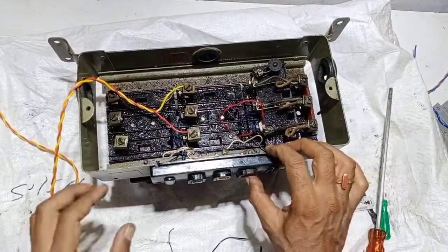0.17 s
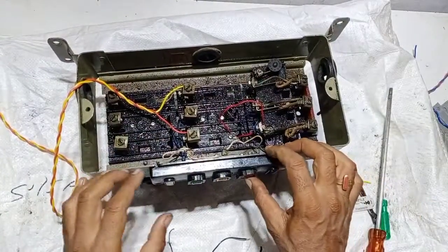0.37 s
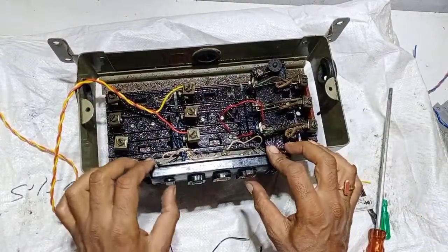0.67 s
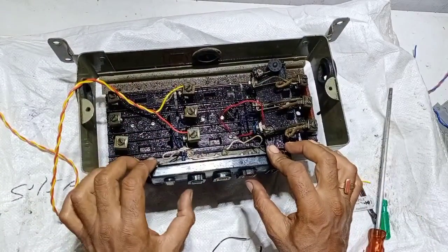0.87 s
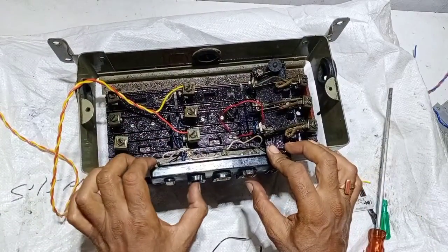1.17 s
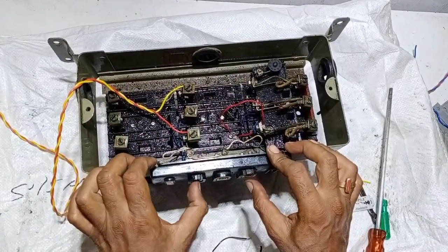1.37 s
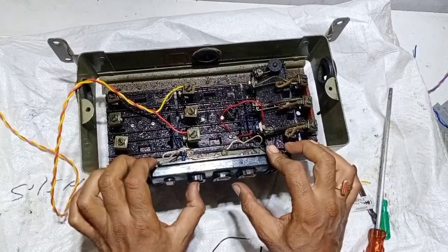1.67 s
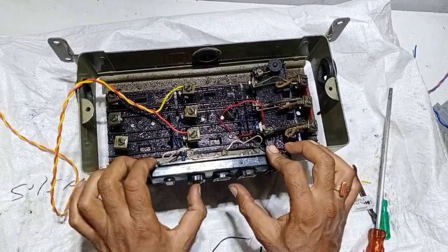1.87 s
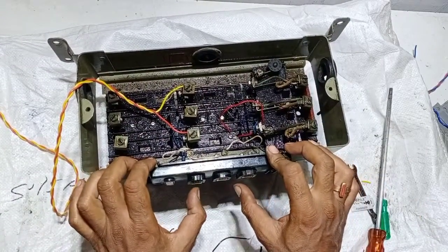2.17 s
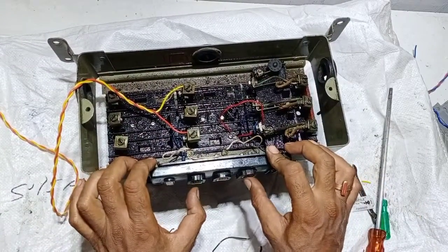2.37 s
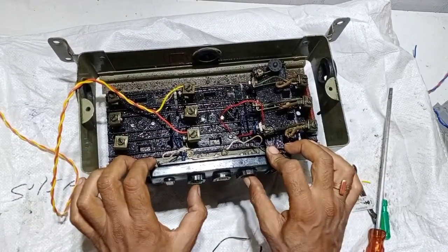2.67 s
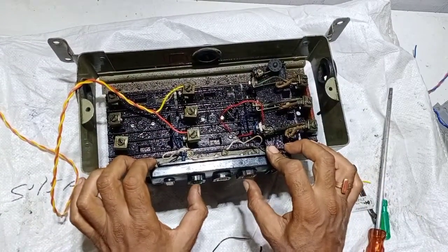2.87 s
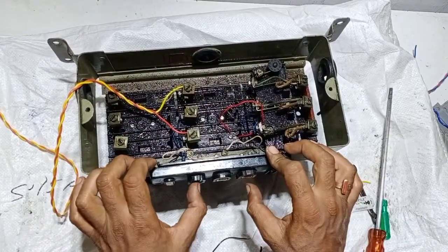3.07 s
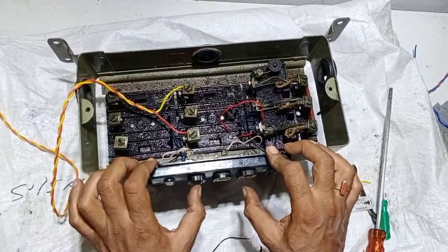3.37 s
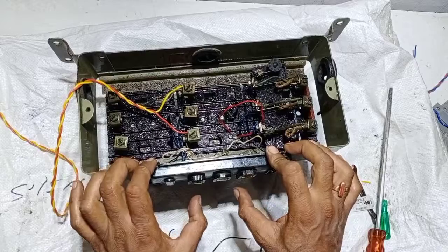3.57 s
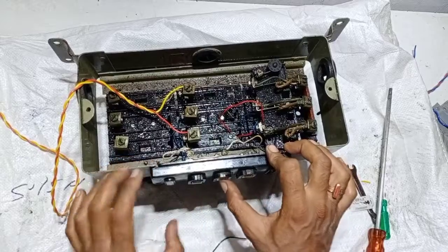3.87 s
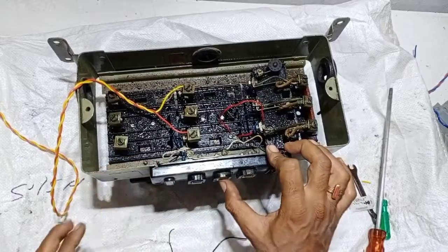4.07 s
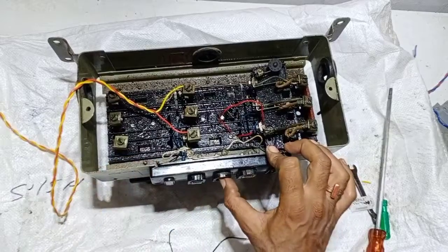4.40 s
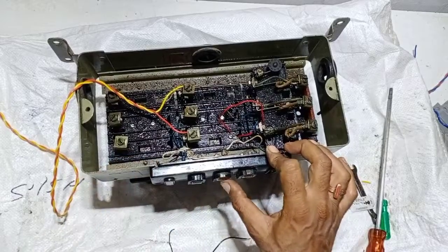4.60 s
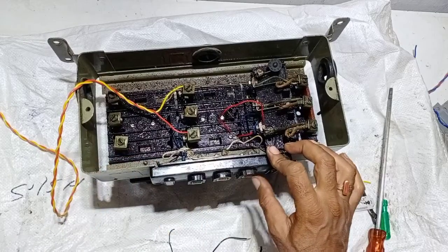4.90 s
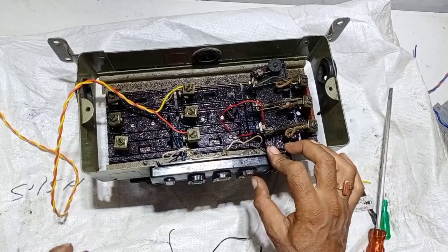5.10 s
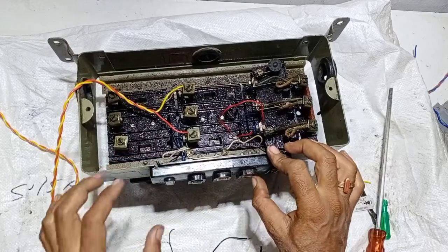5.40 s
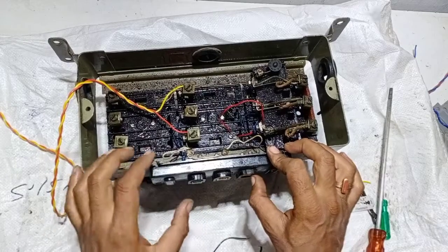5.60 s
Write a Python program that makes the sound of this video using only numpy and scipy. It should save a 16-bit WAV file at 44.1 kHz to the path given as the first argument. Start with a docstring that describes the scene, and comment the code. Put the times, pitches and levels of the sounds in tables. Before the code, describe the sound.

Heavy contactor clacks in pairs with bright metallic pings, framed by two spells of electrical chatter, over a faint passing vehicle and idling engine.

```python
"""On a workshop table, the contactor of a motor starter in an open steel box is pushed in and let go by hand.
Each stroke is a cluster of blows: filtered noise bursts and damped modes for contacts, armature and box.
While the coil pulls, the armature chatters at twice the mains frequency: impulse trains through body responses.
Fingers scuff the steel as shaped noise. Outside, traffic passes as coloured noise over a low drone,
and an engine idles as a sum of wavering firing orders with a faint whirr."""
import sys
import numpy as np
from scipy import signal
from scipy.fft import rfft, irfft, next_fast_len
from scipy.io import wavfile
from scipy.ndimage import uniform_filter1d, map_coordinates

SR = 44100
rng = np.random.default_rng(int(sys.argv[2]) if len(sys.argv) > 2 else 0)


def inscribe(sig):
    """Save sig as 16-bit PCM at rate SR to the path in sys.argv[1].

    A 1-D sig is mono; a 2-D sig holds one channel per row.
    Samples are clipped to [-1, 1] before scaling.
    """
    pcm = np.round(np.clip(np.atleast_2d(sig).T, -1, 1) * 32767)
    wavfile.write(sys.argv[1], SR, pcm.astype(np.int16))


N = 253426
TIME = np.arange(N) / SR  # s, over the whole scene
AGE = np.arange(SR // 2) / SR  # s, since a blow

# Spectra of street noise. Each row: frequency in Hz, relative density in dB per Hz.
RUMBLE_SPECTRUM = [(25, -27), (50, -11), (95, -6.5), (135, 0.5), (230, 0), (320, -11), (500, -31),
                   (1000, -50.5)]
TYRE_SPECTRUM = [(180, -42), (300, -4), (448, -9), (604, -3), (741, -2.5), (1070, 2), (1740, -11.5),
                 (1890, -11.5), (2420, -14), (3090, -34.5), (3500, -41.5), (4550, -55), (7700, -120)]
HISS_SPECTRUM = [(1760, -50.5), (3000, -17.5), (3650, -1), (4440, -5.5), (5480, -2), (7670, -19.5),
                 (9010, -16), (12600, -31), (15100, -29), (16000, -32.5)]  # also colours the coil's sizzle and the finger scuffs
# Level of each street layer, one row apiece: still air in dB, vehicle at its nearest in dB,
# share of the idling engine in dB relative to the engine's level.
RUMBLE_MIX = (-51.5, -43, -7.5)
TYRE_MIX = (-62, -36, -15)
HISS_MIX = (-76.5, -65.5, -27.5)
# Passing vehicle: nearest moment, rounding of the peak, fall on both sides.
PASS_S, PASS_ROUND_S, PASS_DB_PER_S = 1.418, .15, 25.5
# Low drone near 50 Hz. Each row: time in seconds, level in dB.
DRONE_LEVEL = [(0, -48), (.6, -54), (1.45, -41), (1.8, -46.5), (2.6, -53), (3.1, -65), (4.6, -57.5),
               (5.1, -80)]
# Idling engine. Each row: time in seconds, level in dB.
IDLE_LEVEL = [(2.45, -61.5), (2.65, -41), (2.9, -36.5), (3.7, -38), (4.3, -43.5), (4.45, -51), (5.7, -50.5)]
# Partials of the idling engine. Each row: multiple of the firing rate, mean relative level in dB.
IDLE_ORDERS = [(2, -24), (4, -7), (5, -0.5), (7, -8), (11, -19), (13, -23)]
# Spectrum of the engine's whirr. Each row: frequency in Hz, relative density in dB per Hz.
WHIRR_SPECTRUM = [(1400, -42.0), (1900, -10), (2130, 6.0), (2400, -16.5), (3000, -40.5)]

# Reverberation of the workshop. Each row: frequency in Hz, decay time t60 in seconds.
ROOM_DECAY = [(100, 0.65), (300, 0.33), (1000, 0.32), (2300, 0.33), (5000, 0.26), (9000, 0.19),
              (15000, 0.1)]
# Fingers sliding on the steel. Each row: centre in seconds, half length in seconds, level in dB.
SCUFFS = [(1.225, 0.028, -56.5), (1.547, .02, -50), (3.844, 0.12, -60.5), (4.076, .05, -63)]

# Spells of coil pull. Each row: first strike in seconds, end in seconds.
SPELLS = [(.0012, .245), (4.5812, 5.68)]
STRIKE_HZ = 100.06
# Force of the chatter as the hand eases and presses, one curve for each spell.
# Each row of a curve: time in seconds, force in dB.
CHATTER_FORCE = [
    [(0, -39), (.105, -36), (.14, -28.5), (.2, -36), (.24, -33)],
    [(4.6, -24.5), (4.67, -23.5), (4.77, -26), (5, -28), (5.19, -32), (5.245, -43), (5.3, -29),
     (5.41, -28.5), (5.52, -32.5), (5.67, -31.5)],
]
# Spectra of the iron core and of its sharp edge. Each row: frequency in Hz, relative density in dB per Hz.
CORE_SPECTRUM = [(300, -4.5), (600, -6.5), (1000, -17), (1350, -27), (1700, -1.5), (2350, -2), (2900, -9),
                 (3400, -16), (3750, 4), (4650, 4.5), (5900, -4.5), (6700, 3), (7900, -31.5), (10000, -45)]
EDGE_SPECTRUM = [(3500, -17.5), (5300, 1.5), (6700, 13), (8000, -9.5), (9200, 2.5), (10300, -3.5),
                 (12000, -18), (15000, -15.5), (16000, -19.5)]
# Modes of the yoke. Each row: frequency in Hz, relative level in dB, decay time t60 in seconds.
YOKE_MODES = [(1701, 1, .07), (1801, -6, .05), (2201, -4, .06), (2301, 0, .07), (3702, -2, .04),
              (3802, -4, .04), (4603, 0, .04), (4703, 3, .05), (6704, -1, .025)]
# Magnetic hum with the armature home, then loose. Each row: multiple of the strike rate, mean level in dB.
HUM_SEATED = [(2, -40.5), (3, -46.5), (4, -45.5), (5, -55), (6, -58.5), (7, -61), (8, -56.5), (11, -61.5)]
HUM_LOOSE = [(3, -38.5), (4, -38), (5, -41.5), (6, -43.5), (7, -46.5)]
USUAL_FORCE_DB = -30
CORE_DB, SIZZLE_DB = -4.5, -17  # core's answer and hiss between the strikes, relative to the force
EDGE_DB, EDGE_GROWS = -43.5, 2.93  # sharp edge at the usual force; dB gained per dB of force
YOKE_DB, YOKE_GROWS = -37, 0.6  # the same for the ringing yoke
YOKE_SETTLE_DB_PER_S = 2.5  # the yoke sings less as the armature beds in

# Modes of the box on the table and of the armature.
# Each row: mean frequency in Hz, mean relative level in dB, decay time t60 in seconds.
BOX_MODES = [(93.6, -8.5, 0.27), (105.4, -5, 0.35), (138, -2.5, 0.38), (171.7, -1, .4), (235.2, -3, .4),
             (269.7, -1.5, 0.44), (298, -1.5, 0.27), (376, -2, 0.17), (474.7, -2.5, 0.22), (606, -7, 0.037)]
ARMATURE_MODES = [(630, -3.5, 0.082), (807, 7, 0.035), (882, -4, .08), (1220, -7.5, 0.092),
                  (1710, -3, 0.099)]
# Modes of the return spring and the contact frame.
# Each row: centre frequency in Hz, relative level in dB, decay time t60 in seconds.
SPRING_MODES = [(4700, -2, .2), (5330, -4.5, .25), (5320, -1.5, 0.36), (5260, -9, 0.72), (8770, 1, 0.23),
                (8800, -0.5, .28), (8750, 0.5, 0.25), (9100, -7, .2)]
FRAME_MODES = [(2290, -7, 0.16), (4100, -9, 0.092), (4510, -2.5, 0.32), (4630, -3.5, .27), (4650, 1, 0.25),
               (4540, -5.5, 0.22), (4720, -5.5, 0.19), (6800, -9, .18)]
# Spectra of the three parts of a blow. Each row: frequency in Hz, relative density in dB per Hz.
THUD_SPECTRUM = [(50, -41), (80, -17.5), (105, -2), (160, 5.5), (300, 2.5), (520, -4), (700, -9),
                 (1200, -27), (2500, -72)]
KNOCK_SPECTRUM = [(200, -27), (550, -10.5), (800, 2.5), (1100, -1.5), (1500, -4), (1900, -3.5), (2350, -4),
                  (3000, -18), (4500, -31), (9000, -61)]
SNAP_SPECTRUM = [(1200, -32), (2400, -9), (3100, -19), (3900, -3.5), (4600, -1.5), (5300, 0.5), (6000, -4),
                 (6700, 1), (7800, -20), (9100, -5.5), (10500, -12.5), (13000, -19.5), (15000, -15.5),
                 (16000, -21)]
# Hard stops that set steel parts ringing.
# Each row: time in seconds, level of the return spring in dB, level of the contact frame in dB.
PINGS = [(1.5747, -18, -24), (1.770, -47, -24), (3.302, -28, -27.5), (3.369, -41, -19.5)]
# Strokes of the mechanism: a first touch, the blow as it seats, then the box rocks on the table.
# Each row: seating in seconds, travel before it in seconds, touch knock in dB, touch snap in dB, thud in dB,
# knock in dB, snap in dB, first rock in dB, time between rocks in seconds, loss per rock in dB.
STROKES = [ (.269, .014, -28.5, -26.5, -9, -12, -24, -5.5, .021, 11.5),
           (1.5757, .008, -18.5, -21.5, -32.5, -43, -12.5, -16.5, .033, 5),
           (1.770, .0154, -14, -25.5, -11.5, -28, -13.5, -20.5, .017, 8.5),
           (2.7053, 0.016, -20.5, -26, -5.5, -11.5, -26.5, -10, .0206, 6),
           (2.762, .014, -27.5, -23, -19, -18.5, -24.5, -9.5, .0115, 5),
           (3.3, .0092, -23.5, -23, -25.5, -28, -9.5, -31, .02, 6),
           (3.370, .0145, -17, -27, -18.5, -25, -14.5, -15, .021, 6.5),
           (4.481, .013, -20.5, -18, -16.5, -15.5, -18, -15, .018, 5),
           (4.562, .015, -21.5, -21.5, -13.5, -20, -8.5, -29, .02, 7),
           (5.704, .012, -29, -26.5, -7, -14, -25.5, -6, .011, 7), ]
TOUCH_THUD_DB = -3  # thud of a first touch, relative to its knock
ROCK_KNOCK_DB, ROCK_SNAP_DB = -10, -17  # armature and contacts shaken by a rock, relative to its thud
# Single light taps of the mechanism. Each row: time in seconds, thud in dB, knock in dB, snap in dB.
TAPS = [(.374, -27, -32, -49.5), (3.252, -29.5, -35.5, -31), (4.871, -55, -42, -32.5)]


def amp(db):
    """Level to amplitude: 20 dB is a factor of ten."""
    return 10 ** (np.asarray(db) / 20)


def unit(x):
    """Normalisation of mean power: scale to rms 1."""
    return x / np.sqrt(np.mean(x ** 2) + 1e-20)


def lasting(x, seconds):
    """Normalisation of energy: scale to that of a sound of rms 1 lasting so long."""
    return x * np.sqrt(seconds * SR / (np.sum(x ** 2) + 1e-20))


def along(points, hz):
    """Interpolation on a logarithmic frequency axis of rows (Hz, value)."""
    f, values = np.transpose(points)
    return np.interp(np.log(hz + 1), np.log(f), values)


def curves(rows, t=TIME):
    """Linear interpolation in time: each column after the first, read at times t."""
    s, *columns = np.transpose(rows)
    return [np.interp(t, s, column) for column in columns]


def fade(t60):
    """Exponential decay: the amplitude falls 60 dB in t60 seconds."""
    return 1000 ** (-AGE / t60)


def wobble(rate):
    """Slow random modulation: a smooth curve through random knots, rate of them a second."""
    knots = rng.standard_normal(int(N * rate / SR) + 4)
    return map_coordinates(knots, [TIME * rate])


def add(track, s, x):
    """Superposition: mix x into the track from time s on."""
    part = track[max(round(s * SR), 0):][:len(x)]
    part += x[:len(part)]


def colour(points, size=4096):
    """Minimum phase: folding the cepstrum gives a causal impulse response with the given spectrum."""
    cepstrum = irfft(np.log(amp(along(points, np.fft.rfftfreq(size, 1 / SR)))))
    cepstrum[1:size // 2] *= 2
    cepstrum[size // 2 + 1:] = 0
    return irfft(np.exp(rfft(cepstrum)))


def through(x, response):
    """Linear filtering: convolve with an impulse response, keeping the length."""
    return signal.fftconvolve(x, response)[:len(x)]


def rush(spectrum, flutter_db, patchy_db):
    """Coloured noise: a shaped spectrum with a wavering level and patches drifting in time and pitch."""
    z = signal.stft(rng.standard_normal(N), nperseg=1024)[2]
    field = uniform_filter1d(rng.standard_normal(z.shape), size=5, axis=0)
    field = uniform_filter1d(field, size=10, axis=1)
    noise = signal.istft(z * amp(patchy_db * unit(field)), nperseg=1024)[1][:N]
    return unit(through(noise, colour(spectrum))) * amp(flutter_db * wobble(12))


def room_tail(build_s=0.0017):
    """Diffuse reverberation: noise of energy 1 that decays at a rate set by its frequency."""
    hz, t, z = signal.stft(rng.standard_normal(len(AGE)), SR, nperseg=256)
    t60 = along(ROOM_DECAY, hz)[:, None]
    decaying = z * 1000 ** (-t / t60) / np.sqrt(t60)
    tail = signal.istft(decaying, SR, nperseg=256)[1][:len(AGE)]
    tail = tail * (1 - np.exp(-(AGE / build_s) ** 2))
    return tail / np.linalg.norm(tail)


def street():
    """Incoherent sources add in power: still air, a passing vehicle and the engine's noise, over a drone."""
    passing_db = -PASS_DB_PER_S * (np.hypot(TIME - PASS_S, PASS_ROUND_S) - PASS_ROUND_S)
    idle_db, = curves(IDLE_LEVEL)

    def level(still_db, vehicle_db, engine_db):
        """Power sum of the three shares."""
        return np.sqrt(amp(still_db) ** 2 + amp(vehicle_db + passing_db) ** 2 + amp(engine_db + idle_db) ** 2)

    out = level(*RUMBLE_MIX) * rush(RUMBLE_SPECTRUM, flutter_db=2.0, patchy_db=2.0)
    out += level(*TYRE_MIX) * rush(TYRE_SPECTRUM, flutter_db=-0.16, patchy_db=3.5)
    out += level(*HISS_MIX) * rush(HISS_SPECTRUM, flutter_db=-0.1, patchy_db=6)
    drone_hz = 49.4 * (1 + 0.055 * wobble(3.0))
    turns = np.cumsum(drone_hz) / SR
    return out + amp(curves(DRONE_LEVEL)[0]) * np.sin(2 * np.pi * turns)


def engine():
    """Periodic combustion: low orders of an uneven firing rate, with a faint narrow-band whirr."""
    firing_hz = 27.62 * (1 + 0.0042 * wobble(5.1))
    turns = np.cumsum(firing_hz) / SR
    firing = np.zeros(N)
    for order, db in IDLE_ORDERS:
        firing += amp(db + 1.7 * wobble(5.6)) * np.sin(2 * np.pi * (order * turns + rng.random()))
    whirr = rush(WHIRR_SPECTRUM, flutter_db=0.0, patchy_db=-1.0)
    arrival = np.clip((TIME - 2.3) / .5, 0, 1)
    return arrival * amp(curves(IDLE_LEVEL)[0]) * (firing + amp(-21.0) * whirr)


def fingers():
    """Sliding friction: noise under a bell-shaped pressure as skin scuffs the box."""
    pressure = sum(amp(db) * np.exp(-((TIME - s) / half) ** 2) for s, half, db in SCUFFS)
    return pressure * rush(HISS_SPECTRUM, flutter_db=1.5, patchy_db=5)


def tones(orders):
    """Harmonic series locked to the mains: wavering partials at multiples of the strike rate."""
    out = np.zeros(N)
    for order, db in orders:
        phase = 2 * np.pi * (order * STRIKE_HZ * TIME + rng.random())
        out += amp(db + 2.0 * wobble(9)) * np.sin(phase)
    return out


def yoke_ring():
    """Modal response of the yoke to one strike, radiated only within the range of its modes."""
    modes = sum(amp(db) * fade(t60) * np.cos(2 * np.pi * hz * AGE) for hz, db, t60 in YOKE_MODES)
    passband = signal.butter(8, [1450, 7000], "bandpass", fs=SR, output="sos")
    return lasting(signal.sosfilt(passband, modes), 0.0063)


def strikes(times, db, jitter_s, size=8):
    """Band-limited impulses: sinc pulses between samples, each a little off in time and strength."""
    chance = rng.standard_normal((len(times), 2))
    at = (times + jitter_s * chance[:, 0]) * SR
    taps = np.floor(at)[:, None] + np.arange(1 - size, size + 1)
    pulses = amp(db + .5 * chance[:, 1])[:, None] * np.sinc(taps - at[:, None])
    places = np.clip(taps, 0, N - 1).astype(int)
    return np.bincount(places.ravel(), pulses.ravel(), N)


def chatter(times, db, body, grit_db):
    """Repeated impact: once per half cycle the armature hits, rebounds twice and grinds on the pole face."""
    hits = strikes(times, db, jitter_s=1e-5)
    hits += strikes(times + .0009, db - 6.5, jitter_s=2e-5)
    hits += strikes(times + .002, db + 0.5, jitter_s=4e-5)
    contact = AGE * fade(.008)
    grinding_power = through(hits ** 2, contact ** 2 / np.sum(contact ** 2))
    grit = rng.standard_normal(N) * np.sqrt(np.abs(grinding_power))
    direct = through(hits + amp(grit_db) * grit, lasting(body, 0.0038))
    return direct + amp(-7) * through(direct, room_tail())


def buzz():
    """Magnetic pull at twice the mains frequency: core, edge and yoke chatter, brighter when harder, with hum."""
    out = np.zeros(N)
    seated_s = 0.153
    gap = np.clip((seated_s - TIME) / 0.011, 0, 1)  # 1 is loose, 0 is pushed home
    hum = (1 - gap) * tones(HUM_SEATED) + gap * tones(HUM_LOOSE)
    yoke = yoke_ring()
    sizzle = rush(HISS_SPECTRUM, flutter_db=.2, patchy_db=1.5)
    for (start, end), force in zip(SPELLS, CHATTER_FORCE):
        times = np.arange(start, end, 1 / STRIKE_HZ)
        force_db, = curves(force, times)
        excess_db = force_db - USUAL_FORCE_DB
        out += chatter(times, force_db + CORE_DB, colour(CORE_SPECTRUM), grit_db=-2)
        edge_db = EDGE_DB + EDGE_GROWS * excess_db
        out += chatter(times, edge_db, colour(EDGE_SPECTRUM), grit_db=0.5)
        yoke_db = YOKE_DB + YOKE_GROWS * excess_db - YOKE_SETTLE_DB_PER_S * (times - start)
        out += through(strikes(times, yoke_db, jitter_s=1e-5), yoke)
        powered = uniform_filter1d(((TIME > start) & (TIME < end)) * 1., size=400)
        out += powered * (hum + amp(curves(force)[0] + SIZZLE_DB) * sizzle)
    return out


def ring(modes, scatter_db, detune):
    """Modal vibration: damped modes struck at new strengths, each with a little random detuning."""
    chance = rng.standard_normal((len(modes), 3))
    out = np.zeros(len(AGE))
    for (hz, db, t60), (strength, shift, phase) in zip(modes, chance):
        turns = hz * (1 + detune * shift) * AGE + phase
        out += amp(db + scatter_db * strength) * fade(t60) * np.sin(2 * np.pi * turns)
    return out


def burst(body, t60, wet_db, rise_s):
    """Impact excitation: a brief rattle of metal on metal filtered by a body, with its echo."""
    force = rng.standard_normal(len(AGE)) * fade(t60) * (1 - np.exp(-(AGE / rise_s) ** 2))
    direct = lasting(through(force, body), 0.0028)
    return direct + amp(wet_db) * lasting(through(direct, room_tail()), 0.0039)


def ping(modes, wet_db):
    """Phase diffusion: a random phase walk broadens every mode into a rough clang; the room blurs it further."""
    width_hz = 45
    steps = rng.standard_normal((len(modes), len(AGE)))
    phase_walk = np.cumsum(steps, axis=1) * np.sqrt(2 * np.pi * width_hz / SR)
    clang = np.zeros(len(AGE))
    for (hz, db, t60), drift in zip(modes, phase_walk):
        clang += amp(db) * fade(t60) * np.sin(2 * np.pi * (hz * AGE + rng.random()) + drift)
    direct = lasting(clang, 0.018)
    return direct + amp(wet_db) * lasting(through(direct, room_tail()), 0.009)


def blows(count=4):
    """Successive impacts with energy loss: touch, seating, dying rocks and light taps, as rows like TAPS."""
    rows = list(TAPS)
    for s, travel, touch_knock_db, touch_snap_db, thud_db, knock_db, snap_db, rock_db, gap, loss_db in STROKES:
        rows.append((s - travel, touch_knock_db + TOUCH_THUD_DB, touch_knock_db, touch_snap_db))
        rows.append((s, thud_db, knock_db, snap_db))
        for k in range(count):
            db = rock_db - k * loss_db
            rows.append((s + (k + 1) * gap, db, db + ROCK_KNOCK_DB, db + ROCK_SNAP_DB))
    return rows


def clacks():
    """Simultaneous impacts: every blow sounds box, armature and contacts at its own levels."""
    out = np.zeros(N)
    box, armature, contacts = colour(THUD_SPECTRUM), colour(KNOCK_SPECTRUM), colour(SNAP_SPECTRUM)
    swell = 1 - fade(0.058)  # the box's panels take a moment to get going
    for s, thud_db, knock_db, snap_db in blows():
        thud = burst(box, t60=0.015, wet_db=-3.5, rise_s=0.00094)
        thud += amp(-3) * lasting(swell * ring(BOX_MODES, scatter_db=3, detune=.01), 0.0051)
        knock = burst(armature, t60=.022, wet_db=-3, rise_s=0.00082)
        knock += amp(-1.5) * lasting(ring(ARMATURE_MODES, scatter_db=1.5, detune=0.033), 0.0015)
        snap = burst(contacts, t60=0.019, wet_db=-3.5, rise_s=0.0015)
        add(out, s, amp(thud_db) * thud + amp(knock_db) * knock + amp(snap_db) * snap)
    for s, spring_db, frame_db in PINGS:
        add(out, s, amp(spring_db) * ping(SPRING_MODES, wet_db=-7.5))
        add(out, s, amp(frame_db) * ping(FRAME_MODES, wet_db=-7.5))
    return out


def scene():
    """Superposition: all sources add and reach both channels alike."""
    mono = street() + engine() + fingers() + buzz() + clacks()
    return np.array([mono, mono])


def record(dry):
    """Saturation and band limit: the recorder rounds off the highest peaks, then removes the top treble."""
    rounded = dry / (1 + np.abs(dry / .92) ** 6) ** (1 / 6)
    size = next_fast_len(N + SR // 2)
    top_hz, slope_hz = 15900, 400  # middle and width of the cutoff
    passed = np.clip((top_hz - np.fft.rfftfreq(size, 1 / SR)) / slope_hz + .5, 0, 1)
    return irfft(rfft(rounded, size) * passed, size)[:, :N]


dry = scene()
out = record(dry)
inscribe(out)
```